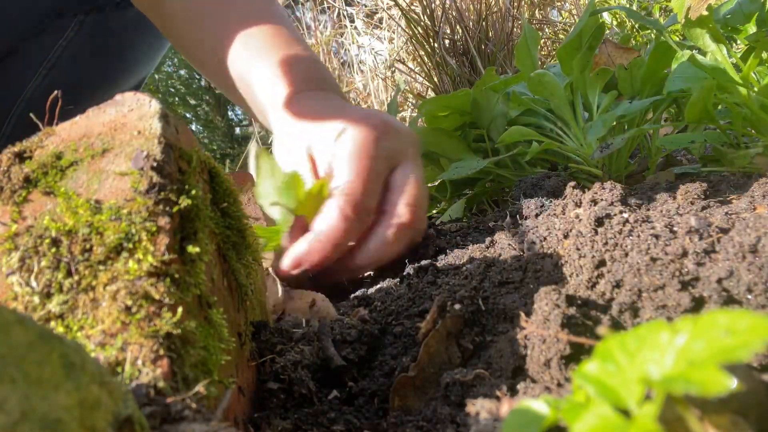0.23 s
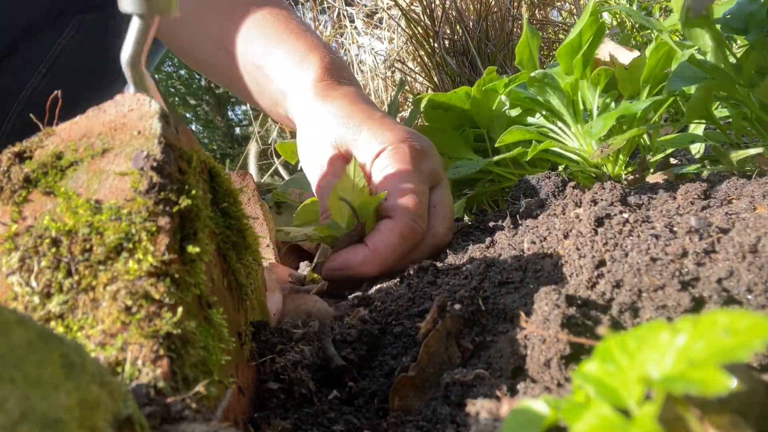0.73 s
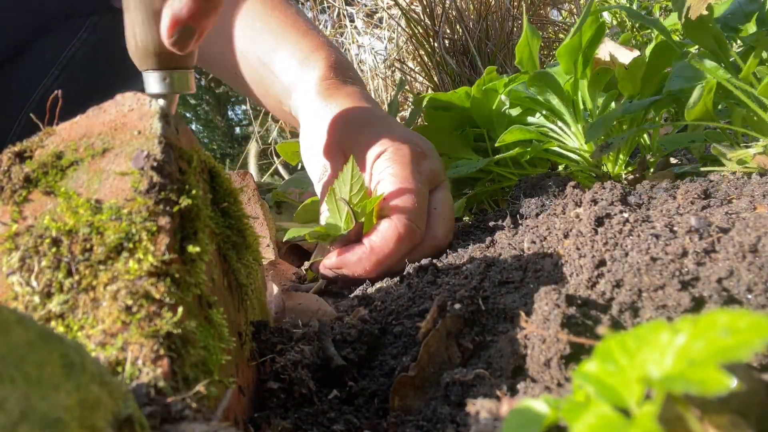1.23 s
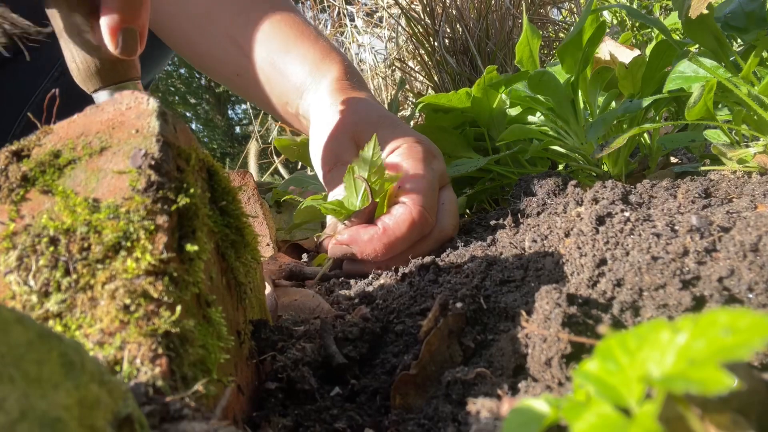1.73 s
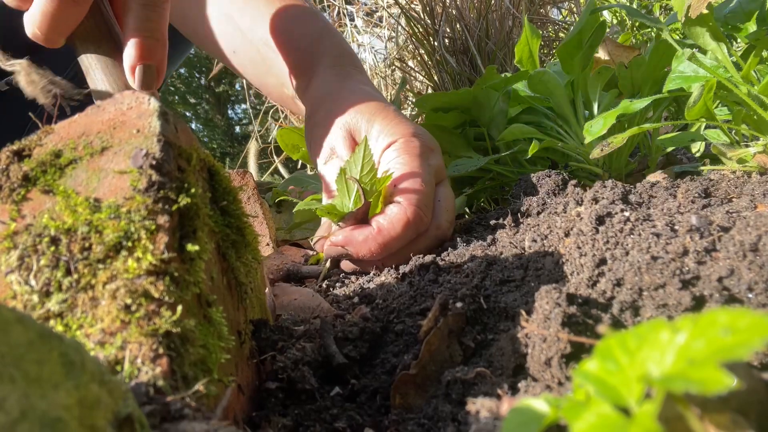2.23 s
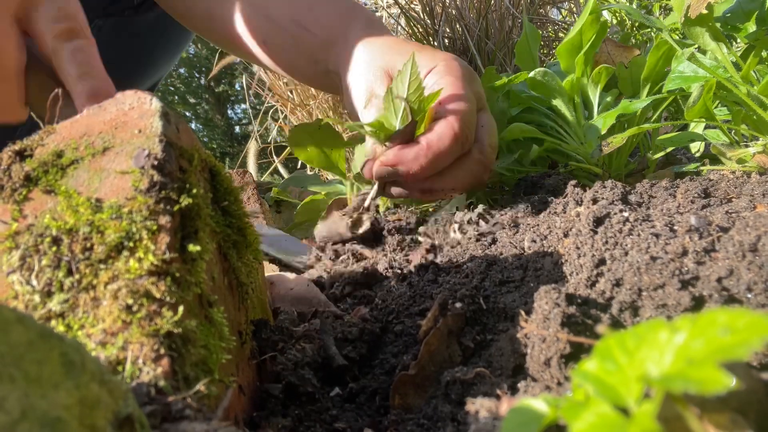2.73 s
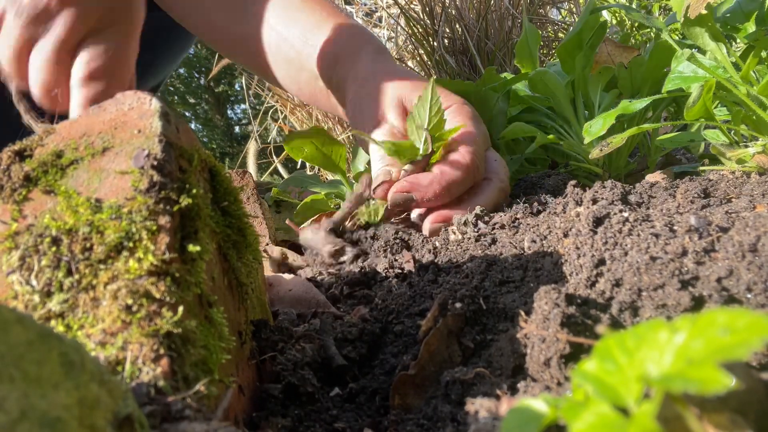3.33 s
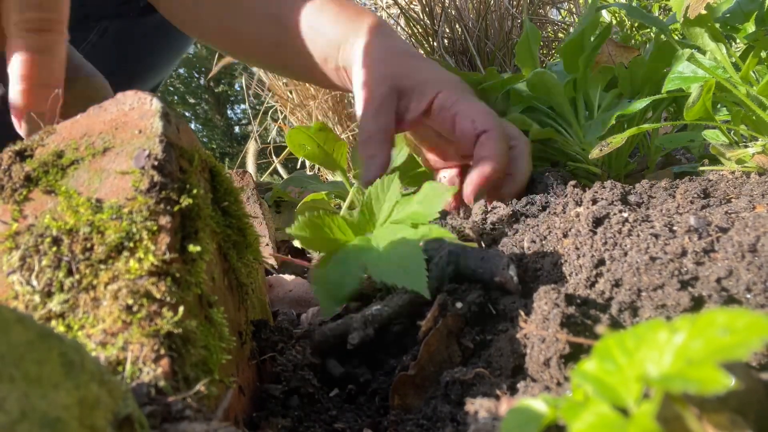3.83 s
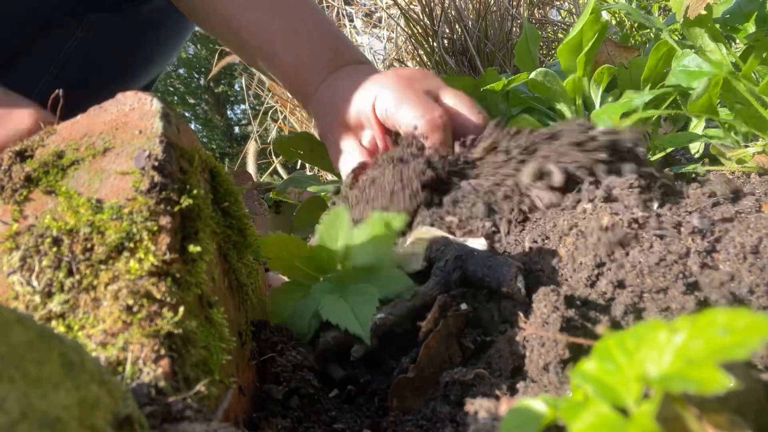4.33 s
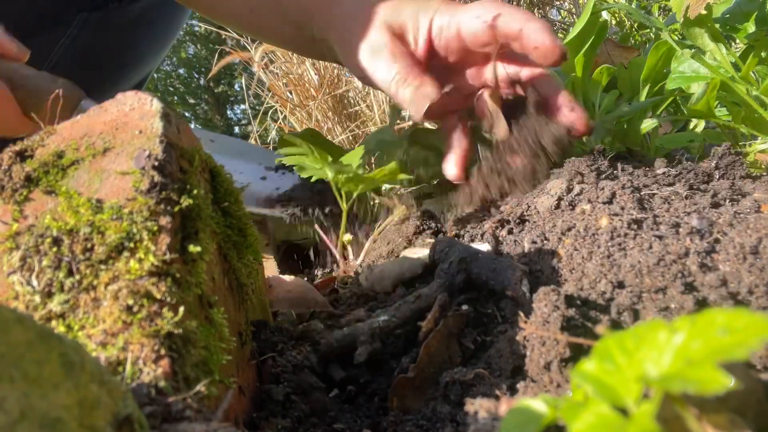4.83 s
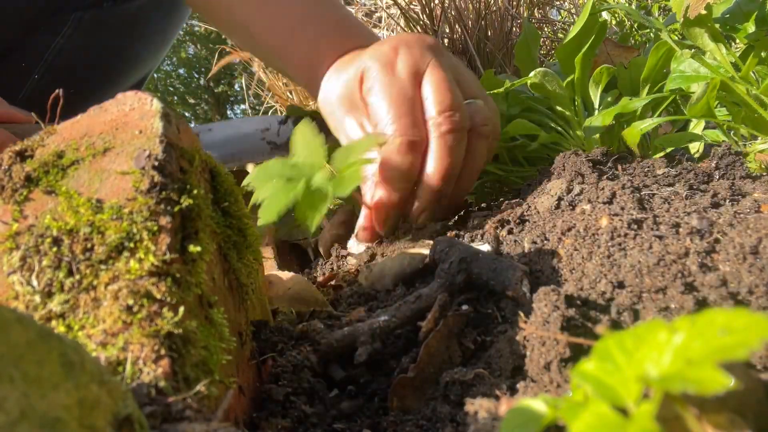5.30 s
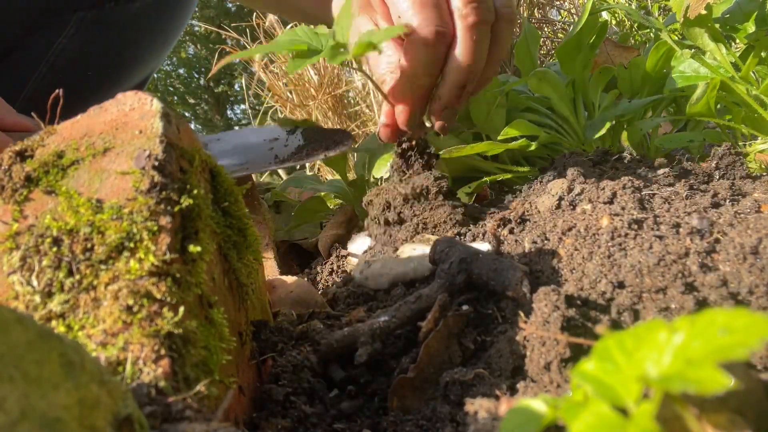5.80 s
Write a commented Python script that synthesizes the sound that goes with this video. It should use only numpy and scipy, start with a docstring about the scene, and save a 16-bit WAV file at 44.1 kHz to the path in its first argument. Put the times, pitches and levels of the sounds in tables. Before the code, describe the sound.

Hands and a steel trowel work crumbly garden soil up close, with root snaps, a ringing scrape on stone, low traffic rumble and a chirping bird.

```python
"""Digging in garden soil

Hands and a steel trowel dig in loose soil close to a stereo microphone. Earth crumbles (clumped, filtered
clicks), roots snap (noise bursts, sinking thuds), hollow clods and pebbles knock (short ringing tones) and the
blade rings (damped modes). A songbird whistles (gliding sines with echoes) over air hush and far traffic
(filtered noise, drones)."""
import sys
import numpy as np
from scipy import signal
from scipy.fft import rfft, irfft, next_fast_len
from scipy.io import wavfile
from scipy.ndimage import uniform_filter1d

SR = 44100
rng = np.random.default_rng(int(sys.argv[2]) if len(sys.argv) > 2 else 0)


def ratio(d):
    """dB to gain"""
    e = np.asarray(d, float) / 20
    return 10 ** e


def unload_wav(signal):
    """Save mono or channel-first audio to the path in sys.argv[1] as 16-bit WAV at rate SR, clipped to [-1, 1]."""
    wavfile.write(
        sys.argv[1],
        SR,
        np.round(np.clip(np.atleast_2d(signal).T, -1, 1) * 32767).astype(np.int16),
    )


N = 267246


def evened(x):
    """Scales to rms 1."""
    return x / np.sqrt(np.mean(x ** 2) + 1e-20)


def peaked(x, db):
    """Scales to a peak level."""
    return ratio(db) * x / np.max(abs(x))


def add(mix, s, sound):
    """Mixes a sound in at time s."""
    part = mix[max(round(s * SR), 0):][:len(sound)]
    part += sound[:len(part)]


def curves(rows):
    """Interpolates every column after t to one value a sample."""
    s, *values = np.transpose(rows)
    return [np.interp(np.arange(N) / SR, s, v) for v in values]


def coloured(x, points):
    """Minimum-phase filter from a spectrum, so clicks stay sharp; rms 1."""
    hz, db = np.transpose(points)
    bins_hz = np.fft.rfftfreq(16384, 1 / SR)
    bins_db = np.interp(np.log(bins_hz + 1), np.log(hz + 1), np.maximum(db, -100))
    log_gain = np.log(ratio(bins_db))
    whole = np.concatenate([log_gain, log_gain[-2:0:-1]])
    taps = np.fft.ifft(np.exp(np.conj(signal.hilbert(whole)))).real[:8192]
    return evened(signal.oaconvolve(x, taps)[:len(x)])


def ring(x, hz, t60_s):
    """Two-pole resonance: one damped mode driven by x."""
    r = 1000 ** (-1 / (t60_s * SR))
    w = 2 * np.pi * hz / SR
    return signal.lfilter([np.sin(w)], [1, -2 * r * np.cos(w), r * r], x)


def band(x, low_hz, high_hz):
    """Band-pass."""
    return signal.sosfilt(signal.butter(2, [low_hz, high_hz], "bandpass", fs=SR, output="sos"), x)


def grains(per_s, spread_db, clump_db, clump_s):
    """Clicks of random sign, size and time; slow noise gathers their levels into clumps."""
    size = ratio(spread_db * np.minimum(rng.exponential(1, N), 4)) * rng.standard_normal(N)
    clumps = evened(uniform_filter1d(rng.standard_normal(N), max(int(clump_s * SR), 1)))
    return size * (rng.random(N) < per_s / SR) * ratio(clump_db * clumps)


def echoed(x, start_s, t60_s):
    """Sparse echoes of random sign, dying away, drawn apart for each channel; tap energy 1."""
    t = np.arange(round(SR / 2)) / SR
    taps = rng.choice([-1., 1.], (2, len(t))) * (rng.random((2, len(t))) < 2500 / SR)
    taps = taps * ratio(-60 * t / t60_s) * (t > start_s)
    taps = taps / np.linalg.norm(taps, axis=1, keepdims=True)
    return signal.fftconvolve(x[None], taps, axes=1)[:, :N]


# phase lead of the left channel, as from a stereo widener: f/Hz, lead/rad
LEFT_LEAD = [(0, 0.1), (40, 0.8), (70, 0.8), (130, 1.4), (250, 1.8), (600, 1.9), (1000, 1.0), (1500, -.8),
             (1900, .3), (2600, -1.0), (3400, -3.0), (4300, -6.3), (5200, -8.6), (6000, -8.9), (6600, -7.2),
             (7200, -7.4), (7750, -6.3), (9550, -6.2), (10000, -5.2), (11200, -3.15), (13000, -3.12),
             (13900, -.9), (14500, 0), (22050, 0)]


def delayed(x):
    """The sound in the right channel: a fixed phase shift that varies with frequency."""
    hz, lead_rad = np.transpose(LEFT_LEAD)
    size = next_fast_len(N + 4096)
    lag = np.interp(np.fft.rfftfreq(size, 1 / SR), hz, lead_rad)
    return irfft(rfft(x, size) * np.exp(-1j * lag), size)[:N]


def split(x):
    """Zero-phase split into the parts below and above 7200 Hz."""
    low = signal.sosfiltfilt(signal.butter(8, 7200, fs=SR, output="sos"), x)
    return low, x - low


# garden hush spectrum: f/Hz, relative level/dB per Hz
AIR_SPECTRUM = [(150, -37), (300, -3.5), (400, -16), (700, -14.5), (1500, -20.5), (2700, -28.5),
                (6000, -29), (9000, -34.5), (13000, -53), (22050, -47)]
AIR_DB = -58.5


def hush():
    """Soft air noise, independent left and right below the split, shared above it."""
    left, other = (coloured(v, AIR_SPECTRUM) for v in rng.standard_normal((2, N)))
    right = split(other)[0] + split(delayed(left))[1]
    return ratio(AIR_DB) * np.array([left, right])


# far traffic over time: t/s, level/dB before balance, left-right likeness/0-1 of the deep part
RUMBLE_CURVE = [(0.0, -33, 1), (1.2, -37.5, 0), (2.0, -35, 0.8), (2.6, -37, 1), (3.5, -32, 0.53),
                (4.4, -36.5, 0.67), (4.75, -38.5, 1), (5.3, -38, 1), (6.06, -34, 1)]
# far traffic spectrum: f/Hz, relative level/dB per Hz
TRAFFIC_SPECTRUM = [(12, -46.5), (20, -29), (52, 1), (80, -3.5), (127, -8), (249, -24.5), (321, -22.5),
                    (420, -37.5), (550, -45), (920, -120)]
DRONE_DB, DRONE_HZ = -38.5, 65.1
PASSING_DB, PASSING_FAR_DB, PASSING_HZ, PASSING_S, PASSING_LENGTH_S = -46.5, -52.5, 166.6, 0.87, 0.3


def traffic():
    """Low noise, channels most alike below 130 Hz; two noise-driven drones, one swelling in passing."""
    level_db, same = curves(RUMBLE_CURVE)
    a, b, c, d = rng.standard_normal((4, N))
    left, other = coloured(a, TRAFFIC_SPECTRUM), coloured(b, TRAFFIC_SPECTRUM)
    behind = delayed(left)
    lowpass = signal.butter(2, 130, fs=SR, output="sos")
    behind_deep, other_deep = (signal.sosfiltfilt(lowpass, v) for v in (behind, other))
    right = 0
    for shared, own, shift in ((behind_deep, other_deep, 0), (behind - behind_deep, other - other_deep, -.35)):
        like = np.clip(same + shift, -1, 1)
        right = right + like * shared + np.sqrt(1 - like ** 2) * own
    swell = np.exp(-((np.arange(N) / SR - PASSING_S) / PASSING_LENGTH_S) ** 2)
    passing = ratio(PASSING_FAR_DB) + ratio(PASSING_DB) * swell
    drones = ratio(DRONE_DB) * evened(ring(c, DRONE_HZ, 0.14)) + passing * evened(ring(d, PASSING_HZ, 0.18))
    rumble = ratio([[-.8], [.8]]) * ratio(level_db) * np.array([left, right])
    return rumble + np.array([drones, delayed(drones)])


# sliding whistles: start t/s, length/s, first f/Hz, last f/Hz, level/dB before output gain
BIRD_GLIDES = [(.44, 0.059, 4750, 4740, -72), (.495, 0.039, 4600, 4520, -68),
               (.585, 0.075, 4120, 4040, -69.5), (4.085, 0.038, 2830, 3160, -57),
               (4.45, 0.035, 9000, 8750, -66), (4.492, 0.029, 8750, 8700, -58),
               (4.518, 0.04, 8740, 8600, -55.5), (4.545, 0.073, 8750, 8670, -63),
               (4.645, 0.033, 8600, 7800, -55), (4.672, 0.038, 8280, 7850, -52.5),
               (4.702, 0.024, 8650, 8750, -53), (4.795, 0.044, 3160, 3660, -58),
               (4.845, 0.021, 3890, 3200, -55.5), (4.866, 0.042, 2760, 2780, -50),
               (4.925, 0.044, 3280, 3440, -52.5), (4.968, 0.03, 3470, 4200, -51),
               (4.994, 0.016, 3960, 4090, -47.5), (5.02, 0.075, 3380, 3320, -64.5),
               (5.098, 0.032, 3560, 5240, -59), (5.116, 0.018, 5280, 4740, -44.5),
               (5.131, 0.018, 4820, 5160, -43.5), (5.149, 0.014, 4900, 5200, -47),
               (5.157, 0.017, 5500, 5440, -50.5), (5.252, 0.02, 4620, 4470, -51),
               (5.275, 0.012, 4900, 3100, -47.5), (5.318, 0.025, 3520, 5250, -55),
               (5.435, 0.028, 3200, 2880, -56), (5.765, 0.052, 7740, 7830, -68)]
# up-and-down flicks: start t/s, length/s, base f/Hz, top f/Hz, level/dB before output gain
BIRD_FLICKS = [(5.288, 0.025, 3270, 3800, -44), (5.402, 0.018, 3280, 4470, -51.5),
               (5.42, 0.016, 3000, 3550, -47), (5.468, 0.01, 3260, 4370, -49.5),
               (5.535, 0.021, 2830, 3600, -57), (5.6, 0.02, 2500, 3100, -58.5)]
FLUTTER_DB, QUAVER = 2.5, 0.012  # rms; quaver as a share of pitch


def songbird():
    """Gliding sines, hoarse by random pitch and level, smeared by echoes from hedges and walls."""
    song = np.zeros(N)
    for notes, path in ((BIRD_GLIDES, lambda u: u), (BIRD_FLICKS, lambda u: np.sin(np.pi * u) ** 1.45)):
        for s, length_s, from_hz, to_hz, db in notes:
            u = np.arange(0, length_s, 1 / SR) / length_s
            quaver, flutter = (evened(uniform_filter1d(v, 110)) for v in rng.standard_normal((2, len(u))))
            hz = (from_hz + (to_hz - from_hz) * path(u)) * (1 + QUAVER * quaver)
            level = ratio(db + FLUTTER_DB * flutter) * np.sin(np.pi * u) ** 0.7
            add(song, s, level * np.sin(2 * np.pi * np.cumsum(hz) / SR))
    return ratio([[6.5], [4.5]]) * song + ratio(1.0) * echoed(song, 0.007, 0.4)


# short ringing tones within the blows and snaps: t/s, level/dB before near gain, f/Hz, t60/s
SHORT_TONES = [(1.274, -36, 810, 0.017), (2.4965, -11.5, 946, 0.013), (2.4968, -16.5, 2200, 0.014),
               (2.4985, -11.5, 444, 0.02), (2.504, -21.5, 106, 0.056), (2.497, -23, 3020, 0.018),
               (2.4962, -14, 4950, 0.011), (2.4962, -19, 3650, .008), (2.5145, -32, 920, 0.016),
               (2.5255, -21, 1000, 0.0079), (2.88, -25.5, 806, 0.015), (2.881, -32, 1415, 0.027),
               (3.048, -38, 2160, .02), (3.058, -33, 458, 0.039), (3.071, -30.5, 1420, 0.019),
               (3.074, -34.5, 433, 0.058), (3.09, -44, 1080, 0.094), (3.094, -35.5, 450, 0.033),
               (3.097, -36, 2030, 0.039), (3.116, -42, 477, 0.028), (3.122, -50, 1150, 0.046),
               (3.133, -44, 1990, 0.034), (3.373, -33.5, 1840, 0.035), (3.386, -26.5, 903, 0.027),
               (3.439, -24.5, 750, 0.011), (3.439, -33.5, 2650, 0.025), (3.467, -38, 1450, 0.044),
               (3.473, -36, 1967, 0.047), (3.476, -40, 570, 0.094), (3.591, -43, 2220, 0.023),
               (3.607, -24.5, 810, .03), (3.643, -31.5, 2344, 0.037), (3.643, -53, 4200, .03),
               (3.595, -50, 4120, 0.06), (5.503, -50.5, 2210, .04), (3.679, -45, 1854, 0.11),
               (3.761, -46.5, 1870, 0.035), (3.965, -28.5, 933, 0.029), (4.16, -29.5, 383, 0.026),
               (4.301, -43, 330, 0.035), (4.314, -41.5, 2045, 0.051), (4.316, -30.5, 445, 0.029),
               (4.622, -26.5, 427, 0.068), (5.0947, -27.5, 1390, 0.018), (5.0945, -37, 1850, 0.011),
               (5.098, -28.5, 426, 0.028), (3.646, -29.5, 990, 0.027), (3.65, -40, 544, 0.03),
               (3.896, -44, 2030, 0.023), (4.003, -42, 2380, .03), (4.018, -39, 2520, 0.018),
               (3.681, -61, 2400, 0.13)]
TONE_RISE_S, TONE_ROUGH = .0012, .35  # roughness: rattle rms over tone peak


def short_tones():
    """Each row is one damped, gritty tone with a soft start."""
    out, t = np.zeros(N), np.arange(5000) / SR
    for s, db, hz, t60_s in SHORT_TONES:
        rattle = evened(band(rng.standard_normal(len(t)), hz * .8, hz * 1.25))
        tone = np.sin(2 * np.pi * hz * t) + TONE_ROUGH * rattle
        decay = ratio(db - 60 * t / max(t60_s, .004))
        add(out, s, decay * np.minimum(t / TONE_RISE_S, 1) * tone)
    return out


THUD_CYCLES, THUD_SAG = 0.76, 0.16  # cycles to the envelope peak; share of pitch lost
PUSH_HZ, PUSH_S, PUSH_DB = 320, 0.0019, -11


def thud(t, hz):
    """A short clunk that sinks in pitch, with a low push of the ground that peaks at PUSH_S."""
    u, v = t * hz / THUD_CYCLES, t / PUSH_S
    sinking_hz = hz * (1 - THUD_SAG + THUD_SAG * np.exp(-u / 3))
    clunk = u * np.exp(1 - u) * np.sin(2 * np.pi * np.cumsum(sinking_hz) / SR)
    return clunk + ratio(PUSH_DB) * v * np.exp(1 - v) * np.sin(2 * np.pi * PUSH_HZ * t)


# roots and clods: t/s, thud level/dB before snap and near gains, thud f/Hz, sizzle over thud/dB, burst t60/s
ROOT_SNAPS = [(0.06, -38, 1032, 0, 0.17), (0.142, -25.5, 1692, 12, 0.054), (0.152, -39, 397, -7, 0.048),
              (0.172, -46, 310, 19, 0.047), (0.372, -54.5, 390, 18, 0.017), (0.393, -53, 380, 16.5, 0.022),
              (0.578, -61, 392, 8, .015), (0.622, -59.5, 297, 25, 0.02), (.709, -43, 894, -6, 0.017),
              (0.728, -35, 1027, -27, 0.019), (0.742, -35.5, 1017, 0, 0.015), (0.761, -36, 1022, -4, 0.19),
              (0.795, -45, 1190, 2, .015), (0.839, -36, 823, -6, 0.019), (0.87, -40.5, 337, 6, 0.028),
              (0.915, -35.5, 1040, -5, 0.04), (0.926, -41, 1480, -8, .02), (0.974, -41.5, 1550, 3, 0.061),
              (1.076, -36.5, 1633, 3.5, 0.028), (1.096, -47, 1610, -4, .02), (1.108, -43.5, 338, 12, 0.024),
              (1.178, -40.5, 334, 7.5, 0.071), (1.273, -32.5, 861, -26, 0.17),
              (1.295, -35.5, 1387, 0, 0.098), (1.413, -35, 347, 1, 0.032), (1.479, -36, 1095, 3.5, 0.018),
              (1.596, -39, 511, 2, 0.016), (1.687, -43, 552, 1, 0.21), (1.942, -37, 413, 9, 0.019),
              (1.964, -37.5, 320, 12, 0.026), (2.252, -41.5, 288, -4, 0.026),
              (2.309, -38.5, 288, -11, 0.052), (2.345, -39.5, 288, -2, 0.02),
              (2.496, -11, 940, -6.5, 0.018), (2.513, -43, 1005, -16, 0.021),
              (2.524, -29.5, 295, -33, 0.019), (2.49, -31, 990, -15, 0.014), (2.568, -50, 307, -15, 0.029),
              (2.678, -46, 301, 2, 0.13), (2.848, -39, 1560, -8, 0.022), (2.865, -39, 1044, -19, 0.025),
              (2.871, -37, 1474, -12, 0.022), (2.8795, -26, 1469, -13, 0.042), (2.928, -52, 1410, 9, 0.012),
              (3.0568, -25, 482, -2, 0.043), (3.067, -24, 398, -3, 0.052), (3.135, -37, 363, 0, 0.03),
              (3.206, -37, 483, -1, 0.075), (3.387, -26.5, 829, -40, 0.008),
              (3.438, -23.5, 640, -36, 0.043), (3.481, -43, 602, -10, 0.025), (3.605, -33, 891, -13, 0.031),
              (3.638, -45, 880, -14, .02), (3.643, -23, 877, -49, 0.04), (3.677, -33, 1210, -45, 0.044),
              (3.698, -44, 1200, -30, .02), (3.7611, -39, 485, 0.5, 0.075), (3.808, -35.5, 356, -42, 0.042),
              (3.965, -21.5, 916, -44, 0.023), (4.152, -40, 1500, -17, 0.024),
              (4.161, -24.5, 366, -11, 0.05), (4.17, -41, 1473, 2, 0.017), (4.072, -36.5, 994, -20, 0.015),
              (4.198, -39.5, 1483, -6, .02), (4.247, -47.5, 1480, 10, .02), (4.295, -37.5, 316, -12, 0.06),
              (4.313, -31.5, 288.6, -14, 0.011), (4.453, -45.5, 1315, 6.5, 0.037),
              (4.621, -23, 416.5, 5, 0.036), (4.839, -50.5, 314, 11.5, 0.025), (4.981, -46, 342, -3, 0.017),
              (5.093, -38, 1053, 10, 0.065), (5.162, -45.5, 306, 14.5, 0.044), (5.288, -48, 388, 7, 0.017),
              (5.355, -42, 910, -22, 0.017), (5.5, -41, 370, 2, 0.016)]
SNAP_DB, LOOSE_DB = -2, 0.5
CRACK_SHARE, CRACK_DB = 0.28, 4  # crack over thud = CRACK_DB + share of the sizzle's dB
STRAIN_S, STRAIN_DB, BREAK_S = .012, -16.5, 0.0011


def snaps():
    """Fibres crackle faintly, then break: a thud in loose earth, a crack and a sizzle of grit."""
    out, t = np.zeros(N), np.arange(6000) / SR - STRAIN_S - BREAK_S
    after = np.maximum(t, 0)
    strain = ratio(STRAIN_DB) * np.exp(3 * t / STRAIN_S) * (t < 0)
    build = strain + np.clip(1 + t / BREAK_S, 0, 1) ** 2
    for s, db, hz, sizzle_db, t60_s in ROOT_SNAPS:
        noise = rng.standard_normal(len(t))
        burst = noise * abs(noise) * ratio(-60 * after / max(t60_s, .003)) * build
        burst[np.argmax(t >= 0)] = 11.36  # main fibre
        loose_earth = peaked(band(burst, 410, 1830), LOOSE_DB)
        body = peaked(thud(after, hz) + loose_earth, db)
        crack = peaked(band(burst, 1400, 6140), db + CRACK_DB + CRACK_SHARE * sizzle_db)
        sizzle = peaked(band(burst, 4620, 12000), db + sizzle_db)
        add(out, s - STRAIN_S, body + crack + sizzle)
    return ratio(SNAP_DB) * out


# trowel modes: f/Hz, level/dB before brightness tilt, t60/s before damping
BLADE_MODES = [(418, -10, .085), (1420, -17, .05), (1866, -11, .07), (2285, -3, .19), (2455, -8, .06),
               (2603, -5, .06), (2890, -12, .04), (3060, -2, .075), (3155, -15, .22), (3370, -13, .04),
               (4048, -4, .055), (4200, -5, .05), (4370, -12, .04), (4975, -10, .04), (5400, -13, .04),
               (6110, -18, .05), (6450, -15, .04), (7020, -16, .04), (7700, -22, .04), (8375, -14, .045),
               (8700, -17, .04), (9430, -15, .035), (10350, -14, .045), (10950, -22, .03)]


def blade(x, bright_db, damping):
    """Modes of the steel, neighbours in opposite phase, tilted by bright_db per octave about 2285 Hz."""
    out = 0
    for k, (hz, db, t60_s) in enumerate(BLADE_MODES):
        out = out + (-1) ** k * ratio(db + bright_db * np.log2(hz / 2285)) * ring(x, hz, t60_s * damping)
    return out


# blade on stones: t/s, level/dB before near gain, brightness/dB per octave,
# t60 factor of clinging soil, grit level/dB before near gain
STONE_KNOCKS = [(2.8798, -27.5, 9.5, 0.63, -28.5), (2.9458, -41, 8.5, 0.45, -53),
                (3.053, -42, 7, 0.79, -43), (3.0977, -32.5, 4, 0.59, -29.5), (3.375, -41, 15, 0.31, -30),
                (3.473, -28, 24, 0.27, -21.5), (3.4832, -51, 24, 0.49, -29), (3.5509, -41.5, 17, 1, -39.5),
                (3.5916, -36, 11, 1, -35), (3.6433, -38, -6.5, 0.41, -66), (3.675, -56, -4, 0.72, -45),
                (3.896, -47, -6, 1, -31.5), (3.9383, -34, 13, 0.94, -28), (3.9906, -36, 8, 1, -36),
                (4.041, -49, 14, 0.45, -45), (4.02, -41, 6, 0.41, -41), (4.62, -12.5, 1, 0.53, -31)]
CONTACT_S, GRIT_RISE_S = 0.0087, 0.0062
PRESS_S, PRESS_FADE_S, PRESS_DB = .014, 0.0034, -6


def knocks():
    """A blow rings the blade while grit crunches; then the soil closes on the blade and mutes it."""
    out, t = np.zeros(N), np.arange(8000) / SR
    muted = ratio(PRESS_DB * np.clip((t - PRESS_S) / PRESS_FADE_S, 0, 1))
    for s, db, bright_db, damping, grit_db in STONE_KNOCKS:
        noise = rng.standard_normal(len(t))
        grit = noise * abs(noise) * np.exp(-(t / CONTACT_S) ** 2) * np.minimum(t / GRIT_RISE_S, 1)
        blow = (t == 0) + .035 * grit
        add(out, s, peaked(muted * blade(blow, bright_db, max(damping, .1)), db))
        add(out, s, peaked(band(grit, 1200, 14000), grit_db))
    return out


# strokes through the soil: peak t/s, swell/s, decay/s (at least 0.02 is used),
# crumbling level/dB before near gain, rubbing over crumbling/dB
SOIL_STROKES = [(0.0, .05, 0.56, -64, 8), (0.16, 0.11, 0.18, -49, -3.5), (.28, 0.8, 0.36, -57, -50),
                (0.738, 0.091, 0.086, -46, -1.5), (.86, 0.038, 0.15, -77, 16),
                (1.018, 0.26, 0.36, -53, 1.5), (1.303, 0.046, 0.042, -45, 2.5),
                (1.43, 0.15, 0.028, -52.5, 1), (1.6, 0.4, 1, -67, 7.5), (1.929, 0.21, 0.29, -57.5, 0),
                (2.3, 0.59, 0.41, -71, 7), (2.51, 0.1, 0.63, -57.5, 2), (3.061, 0.14, 0.29, -48.5, 1),
                (3.26, 0.082, 1, -60, -7), (3.38, 0.22, 0.13, -52.5, 4), (3.42, 0.035, 0.11, -57.5, 5),
                (3.474, 0.1, 0.015, -40, -7), (3.66, 0.94, 0.14, -61, 1), (3.9, 0.069, 0.28, -50.5, -9),
                (4.0, 0.36, 0.38, -55, 7.5), (4.17, 0.056, 0.037, -75, 10),
                (4.22, 0.035, 0.67, -57.5, -0.5), (4.38, 0.7, 0.19, -57, -8),
                (4.634, 0.051, 0.15, -52.5, 2.5), (4.97, 0.26, 0.16, -62.5, -3.5),
                (5.105, 0.014, 0.22, -61, -13), (5.35, 0.35, 0.38, -76.5, 18.5), (5.6, 0.35, 0.6, -79, 15),
                (6.04, 0.034, 0.19, -67, 7)]
# between strokes: crumbling and rubbing level/dB before near gain
REST_LEVELS_DB = [-81.5, -77]
STROKE_DROP_DB = 24  # gained over the swell, lost over the decay


def strokes():
    """Crumbling and rubbing gains: strokes swell and die away in dB, summed in power over a floor."""
    s, rise_s, fall_s, db, rub_db = np.transpose(SOIL_STROKES)[:, :, None]
    late_s = np.arange(0, N + 64, 64) / SR - s
    away = np.where(late_s < 0, -late_s / np.maximum(rise_s, .005), late_s / np.maximum(fall_s, .02))
    shape_db = db - STROKE_DROP_DB * away
    gains = []
    for over_db, rest_db in zip((0, rub_db), REST_LEVELS_DB):
        power = (ratio(shape_db + over_db) ** 2).sum(0) + ratio(rest_db) ** 2
        gains.append(np.repeat(np.sqrt(power), 64)[:N])
    return gains


# spectra of crumbling and of rubbing: f/Hz, relative level/dB per Hz
CRUMB_SPECTRUM = [(300, -21), (600, -5.5), (1000, -6.5), (1700, -15.5), (3000, -9), (4900, -9.5),
                  (6000, -8), (9500, -4), (13500, -10), (16000, -14), (22050, -30)]
RUB_SPECTRUM = [(150, -54.5), (300, 11.5), (500, 9), (1000, 5.5), (2000, -1), (3500, -4.5), (5000, -2),
                (9000, -36)]
# bands of crumbs and of rubbing clods, large to small: low f/Hz, high f/Hz
CRUMB_BANDS = [(300, 600), (600, 1000), (1000, 1600), (1600, 2500), (2500, 3800), (3800, 5600),
               (5600, 8500), (8500, 18000)]
CLOD_BANDS = [(150, 450), (450, 750), (750, 1200), (1200, 2200), (2200, 9000)]
# drag along the blade: t/s, scraping over crumbling level/dB
TROWEL_DRAG = [(0, -20), (2.6, -20), (3.05, -3), (3.3, -8), (3.45, -20), (3.7, -6), (4.0, -8), (4.35, -10),
               (5.0, -20), (6.06, -20)]


def soil():
    """Crumbs of each size trickle in their own clumps, skin and clods rub, grit drags along the blade."""
    crumb_gain, rub_gain = strokes()
    fine = grains(5000, 0.93, 1.3, 0.0047)
    sized = sum(band(grains(2500, 3.0, 4, .012), *edges) for edges in CRUMB_BANDS)
    crack = rng.standard_normal(90) * np.exp(-np.arange(90) / 25)
    lone = signal.oaconvolve(grains(200, 3.5, 3, .03), crack)[:N]
    crumbs = coloured(0.68 * evened(fine) + evened(sized) + 0.35 * evened(lone), CRUMB_SPECTRUM)
    clods = sum(band(grains(2500, 2.6, 3.2, 0.015), *edges) for edges in CLOD_BANDS)
    rubbing = coloured(clods, RUB_SPECTRUM)
    scraping = ratio(curves(TROWEL_DRAG)[0]) * evened(blade(grains(4000, 3.2, 4., .02), 2.5, .15))
    return crumb_gain * (crumbs + scraping) + rub_gain * rubbing


# where the hands work: t/s, left minus right level/dB
HAND_PLACE = [(0.14, -3.5), (0.55, 1), (0.76, -2), (1.27, -1.5), (1.96, 1.5), (2.5, -1.5), (2.88, -2),
              (3.45, -1.5), (3.64, -0.5), (3.96, -2), (4.16, -3), (4.31, -1.5), (4.62, 0.5), (5.1, 2),
              (6.06, -4)]
NEAR_DB, BOUNCE_DB, SETTLING_DB = 5.5, -7.0, -14.0


def scene():
    """Near sounds, phase-shifted between channels, echo off ground, stone and garden walls."""
    near = soil() + snaps() + knocks() + short_tones()
    direct = np.array([near, delayed(near)])
    # three sets of echoes fade in and out in turn, so no fixed colour builds up
    turns = np.arange(N) / SR * 7.3
    bounces = sum(echoed(near * np.cos(np.pi * (turns + k / 3)), 0.0004, 0.009) for k in range(3))
    settling = echoed(near, 0.0086, 0.07)
    echoes = split(ratio(BOUNCE_DB) * bounces + ratio(SETTLING_DB) * settling)[0]
    pan_db = curves(HAND_PLACE)[0]
    placed = (direct + echoes) * ratio([pan_db / 2, -pan_db / 2])
    return ratio(NEAR_DB) * placed + songbird() + traffic() + hush()


def top_cut(x):
    """Nothing passes above the cut-off."""
    return signal.sosfilt(signal.butter(12, 16640, fs=SR, output="sos"), x)


# microphone treble colour and band edge: f/Hz, gain/dB
MIC_RESPONSE = [(0, -2.5), (7000, -3.5), (9000, -3.5), (12000, 2.5), (14000, 1.5), (15800, -1),
                (16600, -38), (17200, -82), (22050, -90)]


def record(dry):
    """Microphone response: 44 Hz bass cut, then a linear-phase treble colour."""
    hz, db = np.transpose(MIC_RESPONSE)
    grid_hz = np.linspace(0, SR / 2, 513)
    colour = signal.firwin2(511, grid_hz, ratio(np.interp(grid_hz, hz, db)), fs=SR)
    cut = signal.sosfilt(signal.butter(4, 44, "highpass", fs=SR, output="sos"), dry)
    return top_cut(signal.oaconvolve(cut, colour[None], "same"))


dry = scene()
out = record(dry)
unload_wav(out)
```